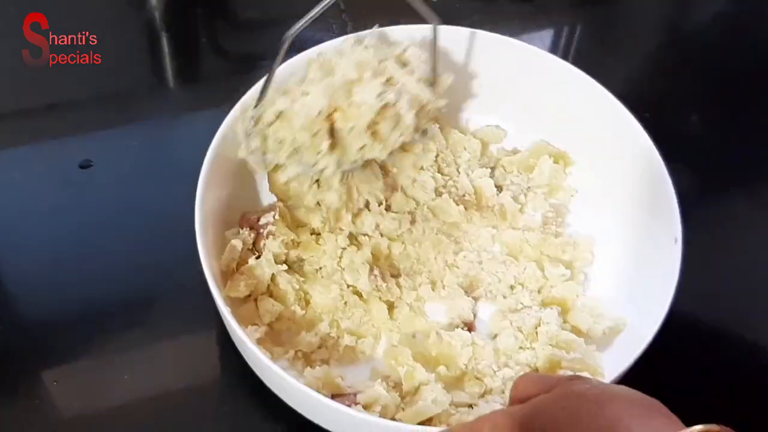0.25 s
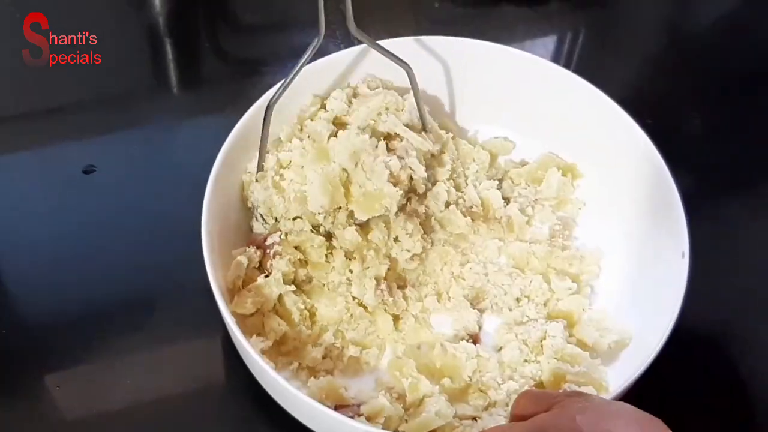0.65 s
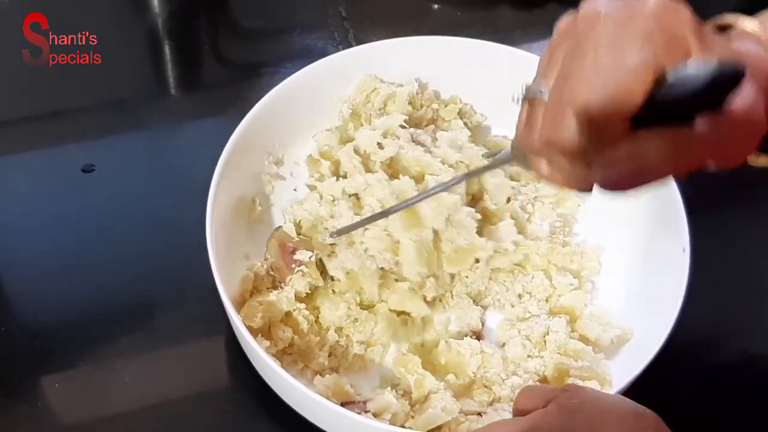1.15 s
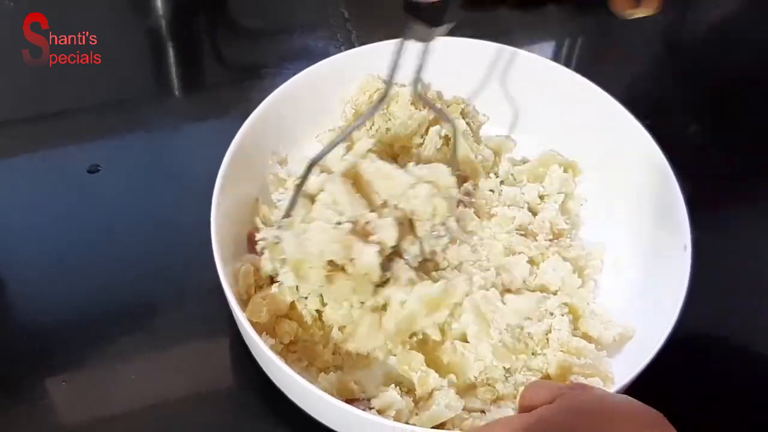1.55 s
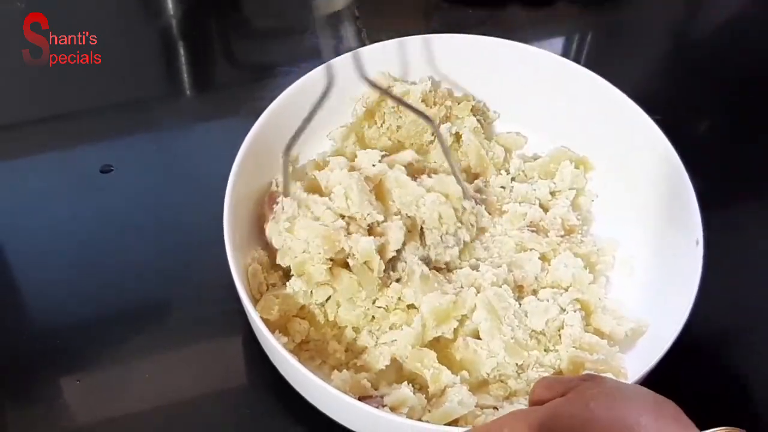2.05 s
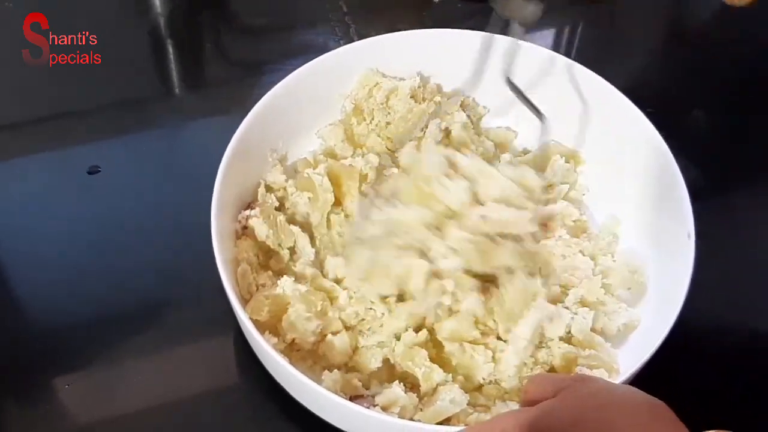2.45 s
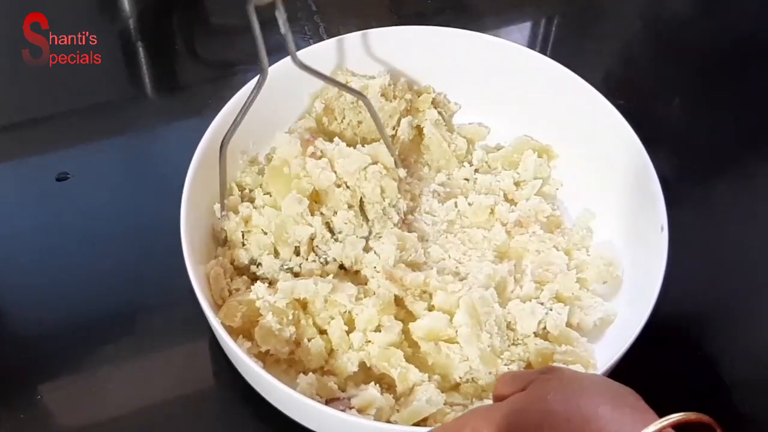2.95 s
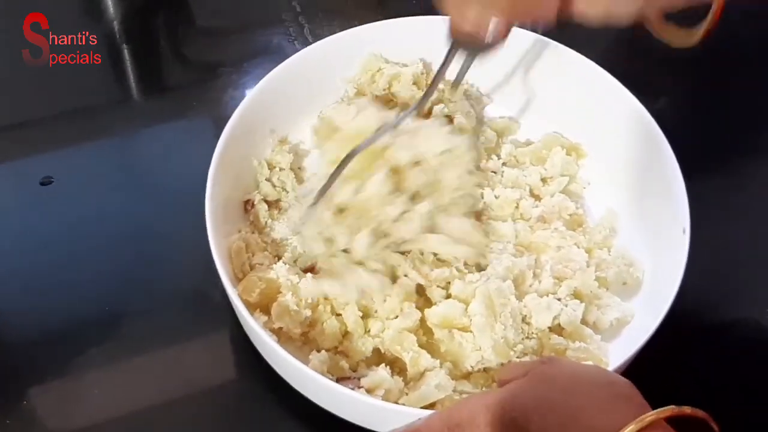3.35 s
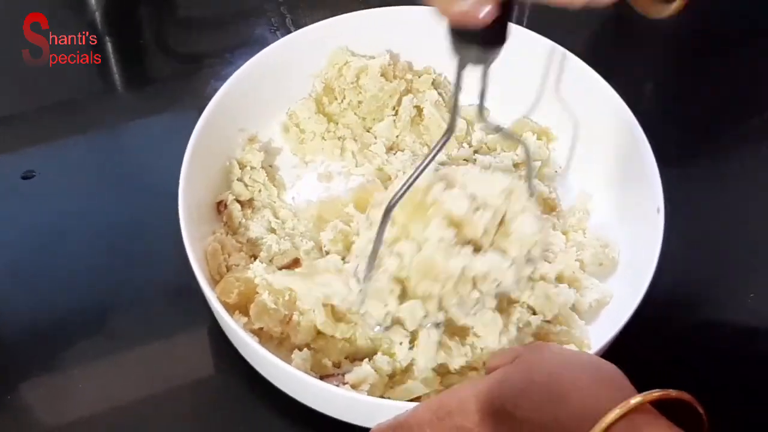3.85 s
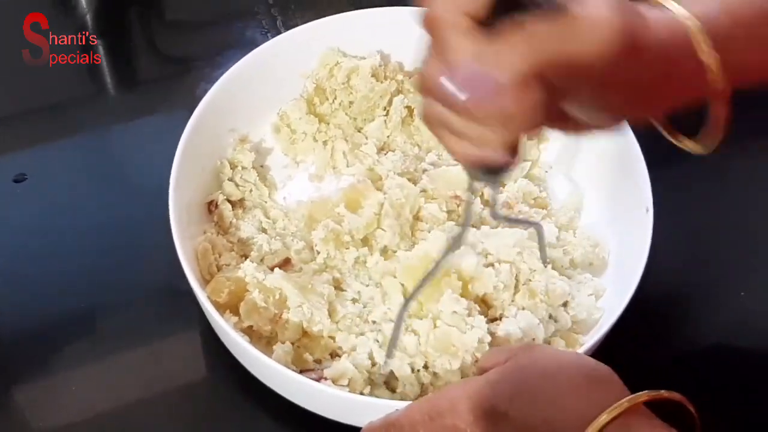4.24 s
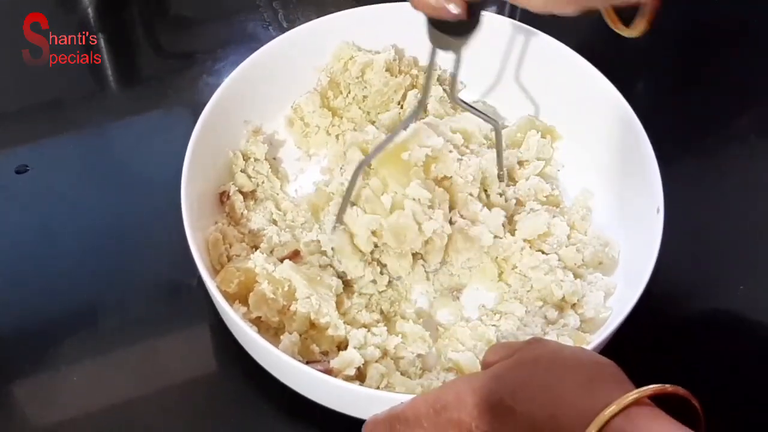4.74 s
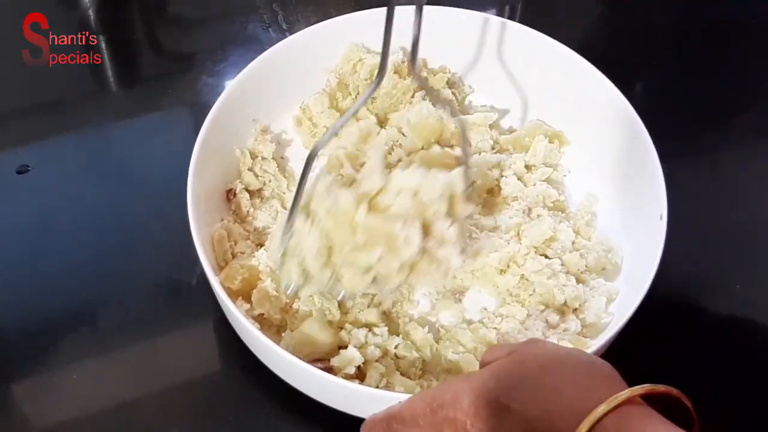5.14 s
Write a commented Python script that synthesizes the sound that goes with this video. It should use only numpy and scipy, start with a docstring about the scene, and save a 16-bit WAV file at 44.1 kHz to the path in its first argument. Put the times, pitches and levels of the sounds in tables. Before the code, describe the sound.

Quiet, moist potato mashing with a wire masher clinking and knocking in a bowl, over a low kitchen hum.

```python
"""A wire masher works boiled potato in a bowl held on a stone counter in a small hard kitchen.
Each impact excites damped normal modes: the wire clinks and taps on the bowl, and strokes cushioned by
the mash knock the bowl against the counter, hardest near the end, where the wire cracks through.
Between blows the mash squishes by stick-slip friction and bursting air pockets. Under it lie a low
room rumble and the wash of the street, with faint far chirps and thin tones."""
import sys
import numpy as np
from scipy import signal
from scipy.fft import rfft, irfft, next_fast_len
from scipy.io import wavfile

SR = 44100
rng = np.random.default_rng(int(sys.argv[2]) if len(sys.argv) > 2 else 0)


def wav_out(sig):
    """Save sig, one row per channel (or a flat mono array), as 16-bit PCM at SR to the path in sys.argv[1]."""
    wavfile.write(sys.argv[1], SR, np.round(np.clip(np.atleast_2d(sig).T, -1, 1) * 32767).astype(np.int16))


N = 237872
HIT = 2 ** 15   # samples in one blow or squish


def from_db(db):
    """Amplitude ratio: a factor of ten for every 20 dB."""
    return 10 ** (np.asarray(db) / 20)


def rms_one(x):
    """Normalisation to unit mean power."""
    return x / np.sqrt(np.mean(x ** 2) + 1e-20)


def at_hz(points, hz):
    """Interpolation on a logarithmic frequency axis."""
    points = np.array(points)
    return np.interp(np.log(hz + 1e-9), np.log(points[:, 0]), points[:, 1])


def add(out, s, sound):
    """Superposition: a sound joins the mix at s seconds."""
    start = max(round(s * SR), 0)
    out[:, start:start + sound.shape[-1]] += sound[..., :N - start]


def swell(t, middle_s, half_length_s):
    """A Gaussian envelope of height 1."""
    return np.exp(-.5 * ((t - middle_s) / half_length_s) ** 2)


def drift(per_s, size):
    """Random modulation: straight lines between Gaussian values."""
    knots = rng.standard_normal(size // 40 + 2)
    return np.interp(np.arange(size) * per_s / SR, np.arange(len(knots)), knots)


def colour(x, points):
    """Minimum-phase (causal) filtering with the given (Hz, dB) response."""
    size = 2 * next_fast_len(x.shape[-1] * 2 // 3)
    gain = from_db(at_hz(points, np.fft.rfftfreq(size, 1 / SR)))
    cepstrum = irfft(np.log(gain))
    cepstrum[1:size // 2] *= 2
    cepstrum[size // 2 + 1:] = 0
    return irfft(rfft(x, size) * np.exp(rfft(cepstrum)))[..., :x.shape[-1]]


def contact(x, hardness, spot_hz=1000, lift_db=0):
    """A harder, shorter contact tilts the spectrum up (dB per octave); each spot has one resonance."""
    tilted = colour(x, [(hz, hardness * np.log2(hz / 1000)) for hz in (300, 4000)])
    spot = signal.lfilter(*signal.iirpeak(spot_hz, Q=5, fs=SR), tilted)
    return tilted + (from_db(lift_db) - 1) * spot


# Coherence of the room's field. Each row: frequency in Hz, left-right correlation.
COHERENCE = [(40, 1), (250, 0.95), (500, 0.76), (1000, 0.034), (3000, 0.019), (16000, 0.03)]

def diffuse(size):
    """A diffuse field is alike at two points in the bass and unrelated in the treble."""
    mid, side = rfft(rng.standard_normal((2, size)))
    alike = np.clip(at_hz(COHERENCE, np.fft.rfftfreq(size, 1 / SR)), -1, 1)
    return rms_one(irfft(np.sqrt(1 + alike) * mid + np.sqrt(1 - alike) * side * [[1], [-1]], size))


# Decay of the kitchen. Each row: band centre in Hz, time to fall 60 dB (T60) in seconds.
KITCHEN_T60 = [(100, 0.7), (400, 0.45), (1500, 0.36), (4000, 0.28), (8000, 0.3), (16000, 0.17)]

def kitchen(gap_s=0.0022, build_s=0.01):
    """Reverberation of unit energy: each band decays exponentially at its own rate."""
    t, hz = np.arange(HIT) / SR, np.fft.rfftfreq(HIT, 1 / SR)
    spectrum = rfft(diffuse(HIT))
    centres = np.array(KITCHEN_T60)[:, 0]
    tail = 0
    for (_, t60), share in zip(KITCHEN_T60, np.eye(len(centres))):
        band = irfft(spectrum * at_hz(np.c_[centres, share], hz), HIT)
        tail = tail + band * np.exp(-np.log(1000) * t / t60)
    build_up = np.clip((t - gap_s) / build_s, 0, 1)
    return rms_one(tail * build_up) / np.sqrt(HIT)


def impact(click, chatter_s, chatter_db, room_db):
    """Direct plus reverberant sound: an impulse, brief chatter of the surfaces, the room's answer."""
    t = np.arange(HIT) / SR
    chatter = rms_one(rng.standard_normal(HIT) * np.exp(-t / chatter_s))
    direct = from_db(chatter_db) * chatter / np.sqrt(HIT)
    direct[0] += click
    return direct + from_db(room_db) * kitchen()


def ring(modes, uneven_db=1.2):
    """Free vibration is a sum of damped modes; higher ones differ more in phase between the ears."""
    t, out = np.arange(HIT) / SR, 0
    for hz, db, t60 in modes:
        decay = np.log(1000) / t60
        phase_gap = np.arccos(np.clip(at_hz(COHERENCE, hz), -1, 1)) * rng.choice([-1, 1])
        phase = phase_gap * np.array([[.5], [-.5]])
        height = from_db(db + uneven_db * rng.normal()) * 2 * decay / SR * rng.choice([-1, 1])
        onset = 1 - np.exp(-(t * hz / 2) ** 2)   # builds up over about two cycles
        out = out + height * onset * np.exp(-decay * t) * np.sin(2 * np.pi * hz * t + phase)
    return out


# Spectrum of the rumble. Each row: frequency in Hz, gain in dB.
RUMBLE_SPECTRUM = [(20, -46), (40, -14.5), (56, -4), (78, -15), (97, 5), (125, -15.5), (160, 10), (195, -4),
                   (238, 9), (300, -3.5), (380, -6.5), (520, -18), (1000, -27.5), (3000, -56)]

def room_rumble(level_db=-55.5, wander_db=1.06):
    """Diffuse low-frequency noise whose level wanders slowly."""
    gain = from_db(level_db - wander_db * drift(per_s=1.7, size=N))
    return gain * rms_one(colour(diffuse(N), RUMBLE_SPECTRUM))


# Spectrum of the street. Each row: frequency in Hz, gain in dB.
STREET_SPECTRUM = [(100, -11.5), (550, -2.5), (740, -1), (850, 5), (970, -6), (1120, 5.5), (1350, 4),
                   (1680, -7.5), (2000, 4), (2600, -11.5), (3700, -15), (6000, -21), (15000, -45)]
# Its swells. Each row: middle in seconds, half length in seconds, level in dB.
STREET_SWELLS = [(0.993, 0.09, -68), (2.6, 0.34, -63.5), (4.012, 0.58, -62)]

def street_wash(rest_db=-72):
    """Incoherent sounds add in power: the street's dull wash swells above a steady floor."""
    t = np.arange(N) / SR
    swell_power = sum((from_db(db) * swell(t, s, half_s)) ** 2 for s, half_s, db in STREET_SWELLS)
    gain = np.sqrt(from_db(rest_db) ** 2 + swell_power)
    return gain * rms_one(colour(diffuse(N), STREET_SPECTRUM))


# Mash squeezed through the wire. Each row: middle in seconds, half length in seconds, level in dB,
# brightness in dB per octave.
SQUISHES = [(0.124, 0.17, -63.5, -4), (0.577, 0.1, -66, -1), (0.955, 0.09, -59.5, 5),
            (1.955, 0.086, -70, -0.5), (2.136, 0.047, -61.5, 12.5), (2.256, 0.08, -67.5, 11.5),
            (2.852, 0.07, -63, 4), (3.04, 0.069, -70, 10), (3.207, 0.07, -55.5, -5.5),
            (3.415, 0.051, -62.5, -3), (3.796, 0.12, -64, -1.5), (4.338, 0.12, -59.5, -4),
            (4.877, 0.21, -68, 16), (5.325, 0.053, -54.5, -11)]
# Spectrum of the mash. Each row: frequency in Hz, gain in dB.
SQUISH_SPECTRUM = [(100, -22.5), (600, -3.5), (1250, 6), (1650, -4.5), (2120, 4), (2800, -3.5), (3900, 5),
                   (5500, -0.5), (7500, -2), (10000, -2), (15500, -1.5)]

def squishes(pops_per_s=2500, pop_spread_db=5, pops_db=-9, stick_db=1.2):
    """Stick-slip friction: moist mash catches and slides on the wire as tiny air pockets burst."""
    out, t = np.zeros((2, N)), np.arange(HIT) / SR
    for s, half_s, db, brightness in SQUISHES:
        sizes = from_db(pop_spread_db * np.minimum(rng.exponential(1, HIT), 3))
        signs = rng.choice([-1, 1], HIT)
        pops = rms_one(sizes * signs * (rng.random(HIT) < pops_per_s / SR))
        mash = colour(diffuse(HIT) + from_db(pops_db) * pops, SQUISH_SPECTRUM)
        slide = rms_one(contact(mash, brightness))
        sticking_gain = from_db(db + stick_db * drift(per_s=45, size=HIT))
        start = max(s - t[-1] / 2, 0)
        add(out, start, slide * swell(t + start, s, half_s) * sticking_gain)
    return out


# Wire meeting the bowl. Each row: start in seconds, strength in dB, cushion of mash from 0 to 1,
# spot resonance in Hz, relative level of free ringing in dB.
CLINKS = [(0.127, -15, 0.27, 5550, -16), (0.3409, 13.5, 0.03, 4000, 3), (0.3513, 16.5, 0.54, 1673, -9.5),
          (2.13, -16.5, 0.76, 5640, -20.5), (2.762, -6.5, 1, 2470, 1), (2.766, -16.5, 0.72, 5170, 10),
          (3.872, -6, 0.75, 4250, -15), (4.114, 7, 1, 2450, -4), (4.126, 2, 0.8, 4000, -8),
          (4.111, 1, 0.44, 7850, -20), (4.656, 6.5, 1, 4300, -28.5), (4.661, 13, 1, 1530, -25),
          (4.6868, 14.5, 1, 880, -28.5), (4.9533, 14.5, 0.8, 780, -32.5)]
# Modes of the steel wire. Each row: frequency in Hz, level in dB when bare and when loaded with mash,
# T60 in seconds.
WIRE_MODES = [(1500, 5, -3, .25), (1574, 12, 11.5, .28), (1690, -3, 11, .22), (1901, 11.5, 1, .3),
              (1994, 12, 3, .3), (2060, 5, 6, .35), (2123, 11.5, 4, .33), (2220, 7, 6, .3),
              (2335, 10, 9, .24), (2450, 6, -4, .28), (2573, 2, -1, .27), (3170, -1, 8, .25),
              (4027, 5, -1, .27), (4120, 7, 3, .27), (4290, 1, 7, .36), (4740, 2, -8, .22),
              (4850, 2, -6, .22), (5006, 2, 0, .27), (5079, 5, -1, .28), (5136, -7, 8, .42),
              (5200, -8, 7, .42), (5735, 3, -12, .22), (5841, 3, -12, .2), (6890, 0, -30, .2),
              (7624, 10, -28, .25), (7720, 2, -30, .22), (8050, -1, -30, .24), (10490, -2, -38, .18),
              (10575, 5, -35, .19), (10760, 1, -38, .18), (12050, -3, -40, .12), (13630, -7, -40, .22)]
# Crowded, short-lived modes of a clink. Each row: frequency in Hz, gain in dB.
CLINK_SPECTRUM = [(30, -44.5), (120, -22), (300, -20), (600, -17), (1200, -15.5), (1650, -9), (2300, -3.5),
                  (3000, -9.5), (3450, -15.5), (4200, -6.5), (8000, -13.5), (9500, -18), (10700, -10),
                  (13000, -14), (16000, -24)]

def wire_clinks():
    """Impact excites the wire's modes; mash damps the treble and leaves mostly the spot's resonance."""
    out = np.zeros((2, N))
    for s, db, cushion, spot_hz, ring_db in CLINKS:
        hardness = np.interp(cushion, [0, 1], [3.7, -8.5])
        lift_db = np.interp(cushion, [0, 1], [-1, 20])
        tick = impact(click=.18, chatter_s=.0019, chatter_db=-6, room_db=2 - 11 * cushion)
        tick = colour(tick, CLINK_SPECTRUM)
        tick = colour(tick, [(7500, 0), (12000, -11 * cushion)])   # mash smothers the top
        modes = [(hz, np.interp(cushion, [0, 1], dbs), t60) for hz, *dbs, t60 in WIRE_MODES]
        wire = from_db(ring_db) * ring(modes)
        add(out, s, from_db(db) * contact(tick + wire, hardness, spot_hz, lift_db))
    return out


# Light taps. Each row: start in seconds, strength in dB, room gain in dB, spot resonance in Hz,
# its lift in dB, treble gain in dB.
TAPS = [(0.1504, 8, -4, 2783, 15, 12), (4.9073, 17, -7.5, 2050, 4.5, -8.5)]
# Crowded, short-lived modes of a tap. Each row: frequency in Hz, gain in dB.
TAP_SPECTRUM = [(30, -37), (250, -13.5), (450, -27), (700, -14), (1150, -15), (1550, -11), (2000, -2),
                (2350, -10.5), (2600, -14.5), (2900, -14), (3300, -22.5), (3700, -9.5), (4100, -21),
                (6000, -24), (9000, -28.5), (16000, -34.5)]

def masher_taps():
    """Heavy damping: held fast, the masher gives a dry tock with no free ringing."""
    out = np.zeros((2, N))
    for s, db, room_db, spot_hz, lift_db, treble_db in TAPS:
        tock = impact(click=.12, chatter_s=.0028, chatter_db=-6, room_db=room_db)
        tock = colour(tock, TAP_SPECTRUM)
        tock = colour(tock, [(4000, 0), (11000, treble_db)])
        add(out, s, from_db(db) * contact(tock, 0, spot_hz, lift_db))
    return out


# Cushioned strokes. Each row: start in seconds, strength in dB, hardness in dB per octave,
# spot resonance in Hz, its lift in dB, place in the bowl from 0 to 2.
KNOCKS = [(0.287, -9, -6, 1060, 14, 0.3), (0.3392, 5, -1.5, 115, 18.5, 1.5), (1.582, -17, -8, 1050, 9, 1),
          (2.7048, -2, -4.5, 1164, 9, 1), (3.390, 1, -3, 393, 9, 1), (3.606, -15, -4.5, 1090, 5, 2.5),
          (3.6573, 17, 1, 1254, 3.5, 1), (3.763, 5.5, -3, 400, 1, 1), (3.867, 15, 0, 620, 9.5, 0),
          (4.1064, 22, 3, 685, 10.5, 0.5), (4.5646, 11.5, 1, 660, 10.5, 2.07),
          (4.655, 25.5, 0.5, 930, 3.5, 1), (4.9505, 23, 0.5, 724, 5.5, 0),
          (5.2509, 9, -2.5, 1225, 10.5, 0.76)]
# Modes of the loaded bowl. Each row: frequency in Hz, level in dB when struck at places 0, 1 and 2,
# T60 in seconds.
BOWL_MODES = [(120, -7, -4, -7, .5), (160, -3, -5, -3, .5), (242, 2, 3, 3, .45), (306, 11.5, 11, 15, .29),
              (333, 9, 4, 6, .27), (389, 2, 13, 10, .28), (452, 0, 12, -3, .32), (606, 11, 6, -3, .26),
              (660, 9, 6, 14, .26), (680, 12, 0, -3, .03), (717, 13, 6, 8, .26), (783, 10.5, 6, 0, .34),
              (840, 8, 3, -6, .3), (903, 0, 12.5, 1, .3), (921, -3, 11.5, -3, .34), (1014, 3, 11.5, 4, .29),
              (1139, 6, -5, 11, .25), (1190, -1, 7, 9, .22), (1304, 5, -1, 3, .28), (1389, -3, 4, -3, .25),
              (1480, -5, 3, -4, .25), (1635, -1, 3, -5, .25), (1954, -8, 0, -8, .3),
              (2223, -1, -8, -6, .28), (2961, -10, -4.5, -14, .22), (3170, -13, -6, -14, .24)]
# Crowded, short-lived modes of a knock. Each row: frequency in Hz, gain in dB.
KNOCK_SPECTRUM = [(30, -47), (110, -23), (210, -13), (330, -5.5), (420, -8), (510, -13.5), (600, -10),
                  (720, -8), (1100, -7.5), (1600, -12), (2200, -13), (3200, -23), (5000, -32.5),
                  (8000, -45), (10000, -52.5), (16000, -66)]

def bowl_knocks(body_db=2, cushion_hz=1500, firm_stroke_db=21):
    """The bowl thumps on the counter; the point of excitation sets how strongly each mode rings."""
    out = np.zeros((2, N))
    # the mash rounds off the first contact
    push = signal.sosfilt(signal.butter(2, cushion_hz, fs=SR, output="sos"), np.arange(HIT) == 0)
    for s, db, hardness, spot_hz, lift_db, place in KNOCKS:
        push_db = -18 + 2.05 * (db - firm_stroke_db)   # stronger strokes press further through the mash
        rattle = impact(click=.1, chatter_s=.012, chatter_db=-6.5, room_db=0)
        thud = colour(rattle + from_db(push_db) * push, KNOCK_SPECTRUM)
        modes = [(hz, np.interp(place, [0, 1, 2], dbs), t60) for hz, *dbs, t60 in BOWL_MODES]
        body = from_db(body_db) * ring(modes)
        add(out, s, from_db(db) * (contact(thud, hardness, spot_hz, lift_db) + contact(body, hardness)))
    return out


def far_tone(hz, blur_hz):
    """Multipath propagation blurs the amplitude and phase of a tone that swells and fades."""
    size = len(hz)
    paths = np.array([drift(blur_hz, size) + 1j * drift(blur_hz, size) for side in range(2)])
    carrier = np.exp(2j * np.pi * np.cumsum(hz) / SR)
    return rms_one(np.real(paths * carrier)) * np.sqrt(np.hanning(size))


# A far bird's repeated chirp. Each row: start in seconds, relative level in dB.
CHIRPS = [(0.57, -72.5), (0.78, -67), (1.005, -68.5), (1.23, -72.5), (1.455, -73), (1.74, -79), (2.37, -77)]

def bird_chirps(peak_hz=3760, length_s=.125, fall=.12, scatter=.005):
    """Frequency modulation: each chirp arches, falls and melts into the room's reverberation."""
    out = np.zeros((2, N))
    along = np.linspace(-.8, 1, round(length_s * SR))   # 0 at the top of the arch
    for s, db in CHIRPS:
        hz = peak_hz * (1 + scatter * rng.normal() - fall * along ** 2)
        chirp = far_tone(hz, blur_hz=330) * from_db(5 * along)   # it grows towards the fall
        room = impact(click=.65, chatter_s=.005, chatter_db=-20, room_db=-6)
        add(out, s, from_db(db) * signal.fftconvolve(chirp, room, axes=1))
    return out


# Thin tones from outside. Each row: start and length in seconds, first and last pitch in Hz,
# level in dB, blur in Hz.
TONES = [(0.772, 0.444, 2160, 2107, -71.5, 130), (0.913, 0.22, 1292, 1190, -68, 99),
         (2.203, 0.81, 1114, 1110, -64, 100.9), (2.22, 0.68, 854, 851, -66, 99.2),
         (4.22, 0.12, 1160, 1170, -46.5, 40), (4.3, 0.1, 1215, 1162, -54.5, 130),
         (4.37, 0.11, 1760, 1776, -50, 168), (4.469, 0.1, 1770, 1760, -54, 70),
         (4.49, 0.14, 1178, 1126, -45.5, 35)]

def thin_tones():
    """Narrow-band sound: far tones glide slightly, most of them downward, blurred by many paths."""
    out = np.zeros((2, N))
    for s, length_s, first_hz, last_hz, db, blur_hz in TONES:
        hz = np.linspace(first_hz, last_hz, round(length_s * SR))
        add(out, s, from_db(db) * far_tone(hz, blur_hz))
    return out


# Cracks just after a knock begins. Each row: start in seconds, strength in dB.
CRACKS = [(3.869, 0), (4.1097, 10), (4.9557, 14.5)]
# Spectrum of a crack. Each row: frequency in Hz, gain in dB.
CRACK_SPECTRUM = [(300, -20), (1500, -9), (2300, -2), (3000, -4.5), (3750, 0.5), (4500, -6), (6000, -19),
                  (8300, -20), (10500, -32), (16000, -42)]

def wire_cracks():
    """Brief contact, broad spectrum: in three firm strokes the wire cuts through and hits the bowl."""
    out = np.zeros((2, N))
    for s, db in CRACKS:
        snap = impact(click=.4, chatter_s=.002, chatter_db=-4, room_db=-3.5)
        add(out, s, from_db(db) * colour(snap, CRACK_SPECTRUM))
    return out


# Level difference between the sides. Each row: frequency in Hz, left minus right in dB.
LEFT_LEAD = [(60, 5.5), (92, 7.5), (140, 2.5), (210, 4.5), (330, -1), (500, 2), (770, 0), (1170, 3.5),
             (1790, 4.5), (2740, 4), (4190, -2), (6410, 4), (9810, 4.5), (15000, 2.5)]

def scene(hiss_db=-77):
    """Superposition of all sources and a faint hiss, louder on the left at most frequencies."""
    mashing = bowl_knocks() + wire_cracks() + wire_clinks() + masher_taps() + squishes()
    background = room_rumble() + street_wash() + from_db(hiss_db) * diffuse(N)
    background *= from_db([[.5], [-.5]])   # leans a little further left
    left, right = mashing + background + bird_chirps() + thin_tones()
    return np.array([colour(left, [(hz, db / 2) for hz, db in LEFT_LEAD]),
                     colour(right, [(hz, -db / 2) for hz, db in LEFT_LEAD])])


def record(dry):
    """Soft saturation rounds the highest peaks; a steep low-pass filter cuts the top."""
    low_pass = signal.ellip(10, .1, 90, 15900, fs=SR, output="sos")
    return signal.sosfilt(low_pass, np.tanh(dry))


dry = scene()
out = record(dry)
wav_out(out)
```